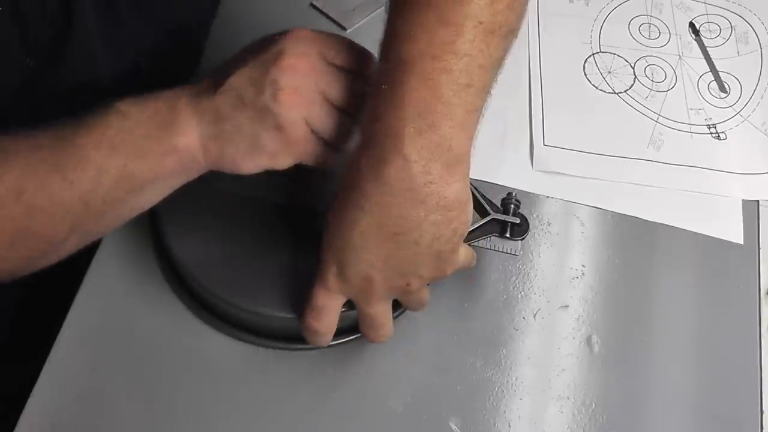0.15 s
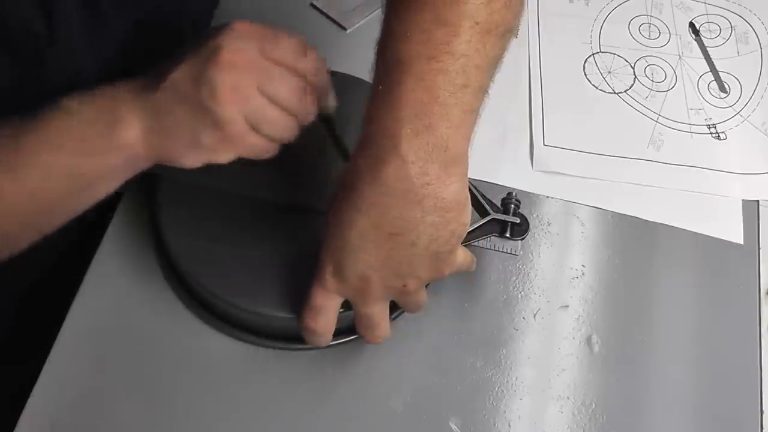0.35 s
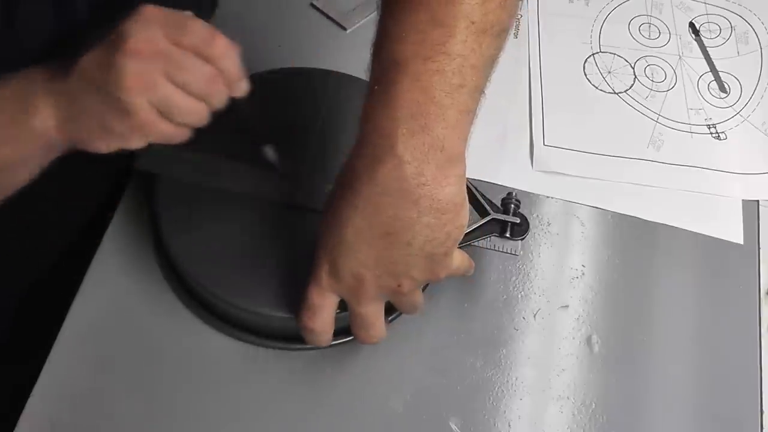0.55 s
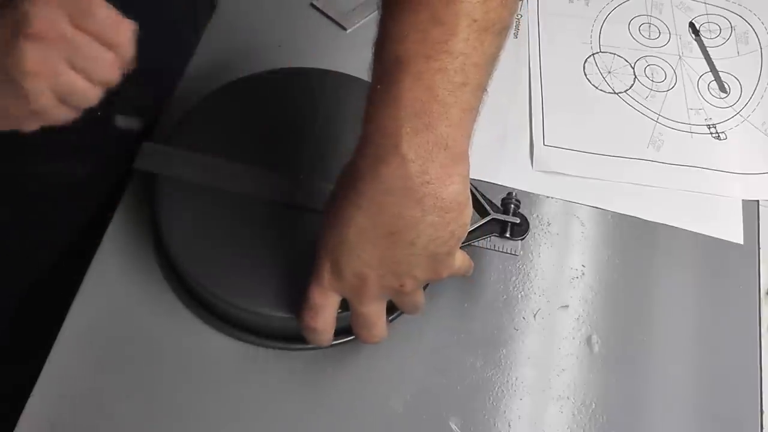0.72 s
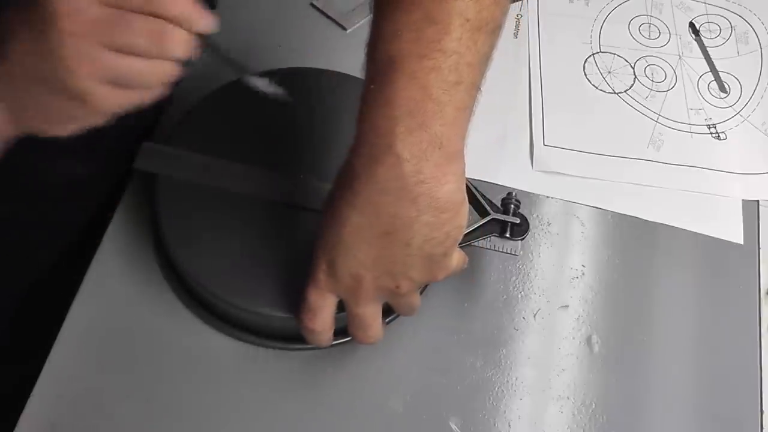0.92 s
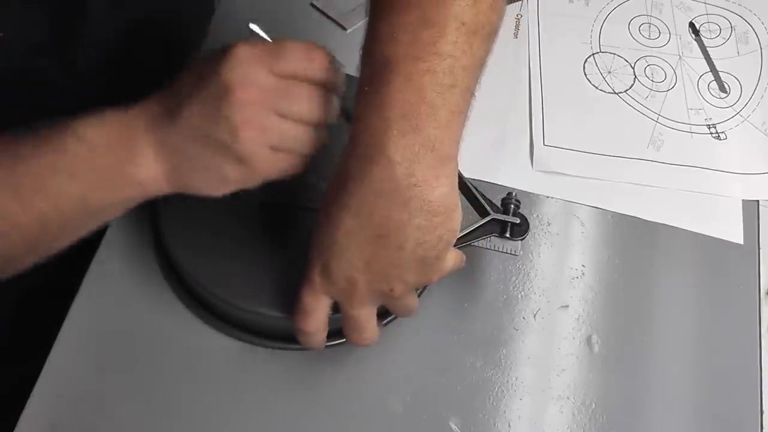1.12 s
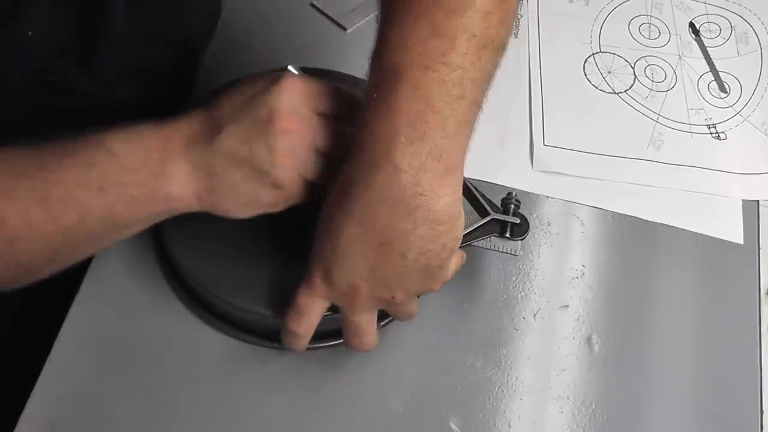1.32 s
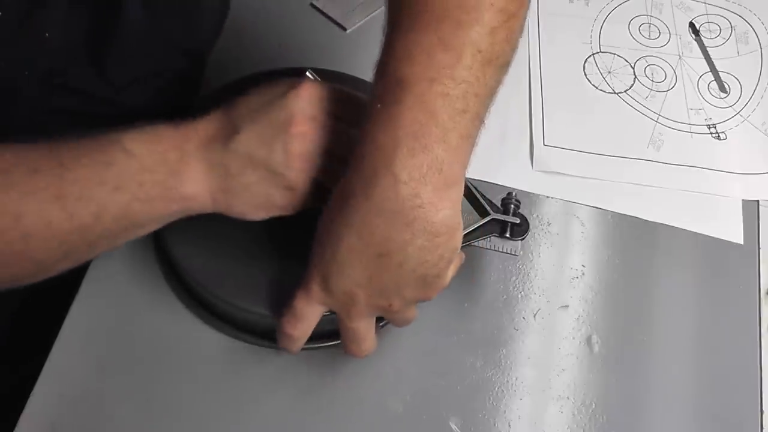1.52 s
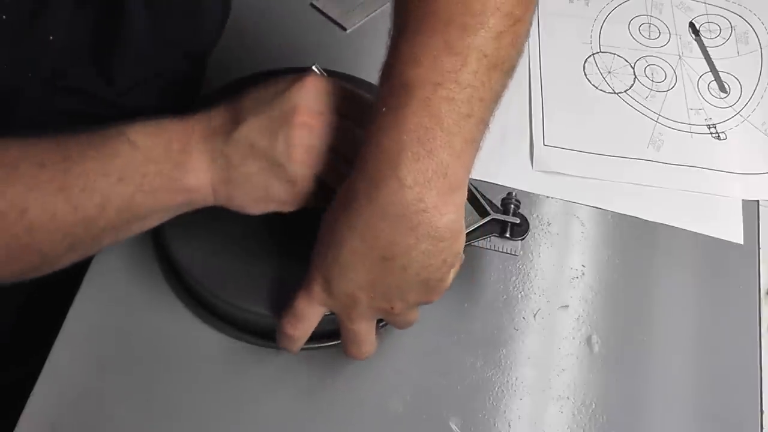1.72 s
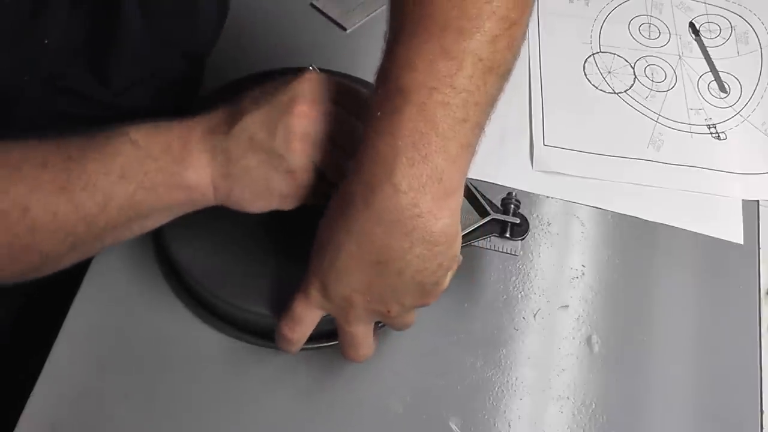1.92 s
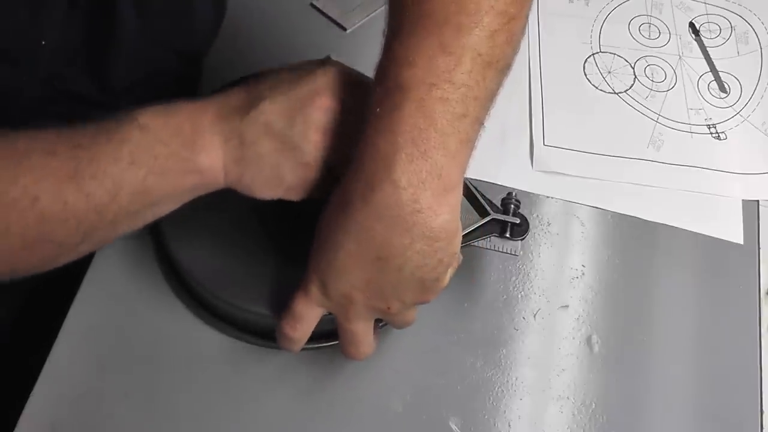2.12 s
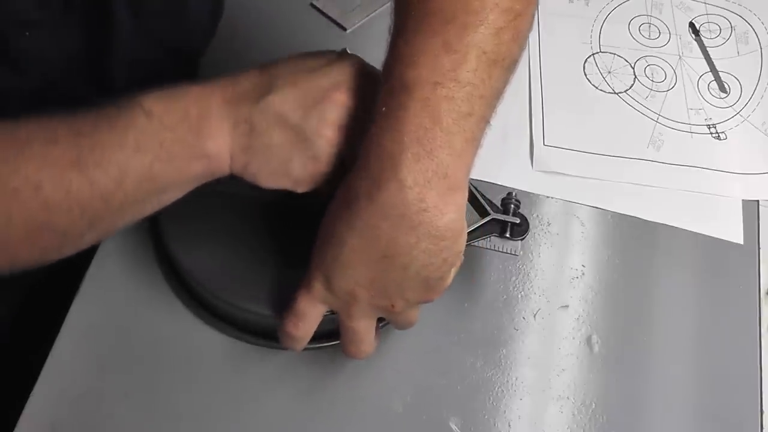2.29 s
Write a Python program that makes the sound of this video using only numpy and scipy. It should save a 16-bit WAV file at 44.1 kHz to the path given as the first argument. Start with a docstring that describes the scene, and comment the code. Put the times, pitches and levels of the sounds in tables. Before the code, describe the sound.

Metal point drawn in one long hissing scratch over a hand-held pan, ending in squeal and knocks

```python
"""Steel scriber across a metal pan.

One long stroke crosses an upturned pan held on a workbench; countless tiny slips ring the pan and
make the scriber hiss. It squeals briefly and knocks off the rim, then is set down and nudged into place.
Random friction impulses and knocks drive filters for pan and shaft; noise echoes form a live workshop."""
import sys
import numpy as np
from scipy import signal
from scipy.fft import rfft, irfft
from scipy.io import wavfile

SR = 44100
rng = np.random.default_rng(int(sys.argv[2]) if len(sys.argv) > 2 else 0)


def to_wav(s):
    """Save 16-bit WAV."""
    ch = np.atleast_2d(s).T  # columns
    pcm = np.round(np.clip(ch, -1, 1) * 32767)  # PCM
    wavfile.write(sys.argv[1], SR, pcm.astype(np.int16))


N = 103635
TIME_S = np.arange(N) / SR


def from_db(db):
    """Decibels to amplitude gain."""
    return 10 ** (np.asarray(db) / 20)


def rms_one(x):
    """Scale to unit power."""
    return x / np.sqrt(np.mean(x ** 2) + 1e-20)


def unit_energy(x):
    """Scale a response so that it keeps the power of white noise."""
    return x / np.sqrt(np.sum(x ** 2) + 1e-20)


def gain_curves(rows):
    """Gains interpolated in dB from (time_s, level_db, ..) rows; -120 dB outside them."""
    time_s, *levels_db = np.transpose(rows)
    return [from_db(np.interp(TIME_S, time_s, db, left=-120, right=-120)) for db in levels_db]


def at_hz(points, hz):
    """Read a table on a log-frequency axis."""
    table_hz, values = np.transpose(points)
    return np.interp(np.log(np.maximum(hz, 1)), np.log(table_hz), values)


def through(x, response):
    """Convolve a signal with an impulse response."""
    return signal.fftconvolve(x, response)[:N]


def colour(points, peaks=()):
    """Minimum-phase response of a body: resonances on a broad spectrum."""
    size = 32768
    hz = np.fft.rfftfreq(size, 1 / SR)
    power = 1
    for centre_hz, width_hz, boost_db in peaks:
        power = power + from_db(boost_db) ** 2 / (1 + (2 * (hz - centre_hz) / width_hz) ** 2)
    magnitude = from_db(at_hz(points, hz)) * np.sqrt(power)
    # folding the cepstrum makes the response causal
    cepstrum = irfft(np.log(magnitude))
    cepstrum[1:size // 2] *= 2
    cepstrum[size // 2 + 1:] = 0
    return unit_energy(irfft(np.exp(rfft(cepstrum))))


def band_filter(x, hz, kind, order=2):
    """Butterworth filter."""
    return signal.sosfilt(signal.butter(order, hz, kind, fs=SR, output="sos"), x)


def dull(x, hz):
    """Soft contact: a low-pass."""
    return band_filter(x, hz, "low")


def drift(cutoff_hz):
    """Slow low-passed noise with unit spread, past the filter's start-up."""
    return rms_one(dull(rng.standard_normal(2 * N), cutoff_hz)[N:])


def swell(peak_s, spread_s):
    """Gaussian rise and fall."""
    return np.exp(-.5 * ((TIME_S - peak_s) / spread_s) ** 2)


def dying(t60_s):
    """Exponential decay, floored at -240 dB."""
    return from_db(-60 * np.minimum(TIME_S / t60_s, 4))


def scatter(decay_s):
    """Burst of dense echoes: whitening alternates with a taper that keeps it short."""
    size = 8192
    burst = rng.standard_normal(size) * dying(decay_s)[:size]
    taper = np.exp(-(TIME_S[:size] / decay_s) ** 4)
    for _ in range(6):
        spectrum = rfft(burst)
        burst = irfft(spectrum / (np.abs(spectrum) + 1e-12)) * taper
    return unit_energy(burst)


# steady air noise spectrum: [hz, relative_db]
AIR_SPECTRUM = [(20, -13.5), (40, -29), (62, -3), (95, -2.5), (122, 2.5), (160, -8.5), (600, -10),
                (1000, -21.5), (2200, -27), (4500, -30.5), (6200, -30.5), (10000, -30.5), (15500, -37.5)]
AIR_DB, AIR_SIDE_DB = -56.5, -4  # side is relative to mid


def air():
    """Steady stereo background: coloured noise in mid and side."""
    mid, side = (through(rng.standard_normal(N), colour(AIR_SPECTRUM)) for _ in range(2))
    return from_db(AIR_DB) * (mid + from_db(AIR_SIDE_DB) * side * [[1], [-1]])


# workshop decay: [hz, t60_s]
ROOM_DECAY = [(100, 3.5), (600, 0.99), (1500, 1.2), (6000, 0.19), (9000, 1), (15000, -0.1)]
# workshop reverberation spectrum: [hz, level_db]
ROOM_SPECTRUM = [(100, -0.5), (230, -15), (450, -17.5), (720, -1), (1000, -10), (1500, -9.5), (4000, -7.5),
                 (7000, -7), (9000, -16), (15000, -11.5)]


def workshop(x):
    """One ear's reverberation: each band of the echo dies at its own rate."""
    edges_hz = np.geomspace(62, 16000, 24)
    white = rng.standard_normal((2, N))  # alternates between neighbouring bands
    tail = 0
    for k, (low_hz, high_hz) in enumerate(zip(edges_hz, edges_hz[1:])):
        hz = np.sqrt(low_hz * high_hz)
        band = band_filter(white[k % 2], [low_hz, high_hz], "band")
        echo = unit_energy(band * dying(at_hz(ROOM_DECAY, hz)))
        bandwidth_gain = np.sqrt(2 * (high_hz - low_hz) / SR)
        tail = tail + from_db(at_hz(ROOM_SPECTRUM, hz)) * bandwidth_gain * echo
    return through(x, tail)


EARLY_DB, EARLY_DECAY_S = -12.5, 0.02


def bench_reflections(x):
    """Short dense echoes, opposite in the two ears."""
    return from_db(EARLY_DB) * through(x, scatter(EARLY_DECAY_S)) * [[1], [-1]]


SLIPS_PER_S, SLIP_SPREAD_DB = 7000, 0.5
CHATTER_HZ, CHATTER_DB = 74, 1


def slips():
    """Friction force: tiny catches of uneven size that come in clumps."""
    spread_db = SLIP_SPREAD_DB * np.minimum(rng.exponential(1, N), 4)
    sizes = from_db(spread_db) * rng.choice([-1, 1], N)
    clumps = from_db(CHATTER_DB * rms_one(dull(rng.standard_normal(N), CHATTER_HZ)))
    catches = rng.random(N) < SLIPS_PER_S / SR
    return rms_one(sizes * clumps * catches)


# hand rub on the pan, and the high hiss dying away after the stroke: [time_s, hand_rub_db, high_hiss_db]
RUB_AND_TAIL_LEVELS = [(0, -43.5, -66.5), (.07, -67, -70), (.14, -53, -74), (.83, -51, -45),
                       (1.02, -42, -53.5), (1.12, -55, -70), (1.32, -57, -64.5), (1.42, -60, -73),
                       (1.55, -61, -73), (2.1, -52, -73), (2.35, -65, -76)]
HAND_DULL_HZ = 480


def hand_rub_and_hiss_tail(friction):
    """A dulled hand rub on the pan, and faint friction for the high hiss dying away after the stroke."""
    rub, high_hiss = gain_curves(RUB_AND_TAIL_LEVELS)
    return dull(rub * slips(), HAND_DULL_HZ), high_hiss * friction


# friction squeaks: [centre_s, spread_s, pitch_hz, width_hz, level_db]
SQUEAK_EVENTS = [(0.035, 0.08, 379, 40, -49.5), (1.33, 0.036, 2530, 89, -70),
                 (1.81, 0.036, 5410, 170, -66.5)]


def squeaks():
    """Faint squeaks and rasps: short swells of friction in one narrow resonance."""
    total = np.zeros(N)
    for centre_s, spread_s, pitch_hz, width_hz, level_db in SQUEAK_EVENTS:
        b, a = signal.iirpeak(pitch_hz, pitch_hz / width_hz, fs=SR)
        tone = rms_one(signal.lfilter(b, a, slips()))
        total += from_db(level_db) * swell(centre_s, spread_s) * tone
    return total


# light rubbing while the point is placed: [time_s, pan_rumble_db, scriber_hiss_db]
NUDGE_LEVELS = [(1.62, -28, -60), (1.655, -43, -80), (1.69, -40, -81), (1.73, -49, -72),
                (1.755, -32.5, -57), (1.795, -33.5, -60), (1.825, -45.5, -68), (1.854, -40, -60),
                (1.89, -49.5, -89), (1.955, -51, -73), (1.975, -75, -118)]
RUB_DULL_HZ = 850


def nudge(friction):
    """Light friction: a dulled rumble force on the pan and a hiss force on the shaft."""
    rumble, hiss = gain_curves(NUDGE_LEVELS)
    return dull(rumble * friction, RUB_DULL_HZ), hiss * friction


# knocks of the point on the pan: [start_s, knock_db, centre_hz, q, tick_db]
TAP_EVENTS = [(.803, 5, 816, 2.7, -18), (.817, 11.5, 700, 2.2, -11.5), (.840, 5, 735, 2.4, -27),
              (.866, 2, 637, 2.4, -42), (1.616, -7.5, 1780, 2.5, -27), (1.618, 0, 292, 0.39, -30),
              (1.743, -13, 840, 0.94, -30), (1.775, 1, 510, 1.32, -19), (1.782, 1.5, 713, 1.36, -26),
              (1.953, -16, 494, 1.06, -44), (2.066, -16.5, 550, 0.94, -30), (2.070, -21, 1600, 1.2, -31.5)]


def taps():
    """Knock forces: a soft push on the pan in one band, a sharp tick on the shaft."""
    push, tick = np.zeros(N), np.zeros(N)
    for start_s, knock_db, centre_hz, q, tick_db in TAP_EVENTS:
        click = signal.unit_impulse(N, int(start_s * SR))
        b, a = signal.iirpeak(centre_hz, max(q, .5), fs=SR)
        once = signal.lfilter(b, a, click + 1e-18)  # tiny offsets avoid denormals
        push += from_db(knock_db) * signal.lfilter(b, a, once + 1e-18)
        tick += from_db(tick_db) * click
    return push, tick


# squealing shaft modes: [pitch_hz, width_hz, boost_db]
SQUEAL_MODES = [(5980, 250, 16.5), (8480, 80, 12), (8230, 78, 10.5), (8680, 69, 13.5)]
# broad band under the squeal: [hz, relative_db]
SQUEAL_SPECTRUM = [(300, -70), (3000, -37), (5700, -9), (9000, 1.5), (15000, -23)]
SQUEAL_PEAK_S, SQUEAL_RISE_S, SQUEAL_FALL_S = 0.7765, 0.06, 0.0085  # Gaussian spreads
SQUEAL_DB, SQUEAL_ROOM_DB = -23, -6.5  # room send is relative to the direct squeal


def squeal():
    """High shaft modes swell as the point speeds up, then break off."""
    spread_s = np.where(TIME_S < SQUEAL_PEAK_S, SQUEAL_RISE_S, SQUEAL_FALL_S)
    modes = through(slips(), colour(SQUEAL_SPECTRUM, SQUEAL_MODES))
    return from_db(SQUEAL_DB) * swell(SQUEAL_PEAK_S, spread_s) * modes


# shaft resonances under pressure: [pitch_hz, width_hz, boost_db]
PRESSED_MODES = [(2680, 600, 4.5), (3115, 71, 9.5), (5550, 300, 8), (6180, 150, 12), (6560, 320, -4.5),
                 (8910, 880, 9.5), (12200, 250, 10.5)]
# hiss under pressure: [hz, relative_db]
PRESSED_HISS = [(150, -73), (1200, -16), (2200, -8), (2700, 4.5), (4000, 3.5), (4700, 0.5), (5700, 6.5),
                (7400, 6), (9200, 0.5), (10200, -0.5), (10800, -6.5), (13500, -11.5), (15700, -19)]
# shaft resonances when lightly held: [pitch_hz, width_hz, boost_db]
FREE_MODES = [(5350, 110, 11.5), (5880, 100, 10.5), (6370, 120, 14), (8730, 57, 15)]
# hiss of a light touch: [hz, relative_db]
TOUCH_HISS = [(150, -46), (1200, 5), (2500, -1.5), (3800, -0.5), (4700, -4.5), (5400, 3.5), (7400, 3),
              (9500, -6), (12000, -13), (15700, -16)]
SHAFT_DECAY_S = 0.018


def scriber(hard, light):
    """A light touch lets the shaft ring; hard pressure damps it and favours broad hiss."""
    pressed = through(hard, colour(PRESSED_HISS, PRESSED_MODES))
    free = through(light, colour(TOUCH_HISS, FREE_MODES))
    return through(pressed + free, scatter(SHAFT_DECAY_S))


# clear pan modes: [pitch_hz, width_hz, boost_db]
PAN_MODES = [(200.6, 9.4, 14.5), (224.7, 12.6, 17), (299.2, 15.8, 8.5), (339.4, 9, 12.5), (439, 6.8, 12.5),
             (479.8, 17, 11.5), (527, 20, 6.5), (656.3, 35, 9), (746, 7.7, 2.5), (859.4, 25, 3),
             (1173, 45, 8), (1247, 17.6, 11.5), (1340, 45, 4.5), (1512, 30, 13)]
# dense pan ringing: [hz, relative_db]
PAN_SPECTRUM = [(30, -51), (100, -12.5), (170, -4.5), (270, -2.5), (720, 2), (1000, -8), (1130, -4.5),
                (1600, -10.5), (1880, -6.5), (2050, -18), (4000, -32), (10000, -112)]
PAN_DECAY_S = 0.0246


def pan(force):
    """Clear modes over a dense ring that the hand damps quickly."""
    modes = np.pad(colour(PAN_SPECTRUM, PAN_MODES), (0, N))
    return through(force, through(modes, scatter(PAN_DECAY_S)))


STREAK_DB, STREAK_HZ = 2.2, 16


def streaks(x):
    """As the point travels, each band of its scrape swells and fades on its own."""
    edges_hz = np.geomspace(180, 16000, 44)
    spectrum = rfft(x)
    band = np.digitize(np.fft.rfftfreq(N, 1 / SR), edges_hz)
    total = np.zeros(N)
    for k in range(len(edges_hz)):  # everything above the last edge is left out
        total += irfft(spectrum * (band == k), N) * from_db(STREAK_DB * drift(STREAK_HZ))
    return rms_one(total)


# long stroke: [time_s, pan_ringing_db, pan_bass_db, scriber_hiss_db]
STROKE_LEVELS = [(.13, -80, -51, -72), (.16, -46, -30, -57.5), (.196, -38, -35, -44),
                 (.25, -39, -30.5, -47.5), (.275, -38.5, -29.5, -50), (.338, -34, -34, -41.5),
                 (.39, -37, -28, -38), (.455, -30, -27.5, -34.5), (.53, -31.5, -27.5, -37),
                 (.59, -22, -18.5, -35.5), (.655, -23, -19, -34.5), (.71, -22.5, -31, -29.5),
                 (.762, -30.5, -48, -35.5), (.794, -30.5, -48, -32.5), (.819, -27, -48, -27),
                 (.829, -62, -65, -41)]
BASS_SPLIT_HZ = 294


def stroke(friction):
    """Streaky friction drives shaft and upper pan; separate slips drive the pan's bass."""
    ring, bass, hiss = gain_curves(STROKE_LEVELS)
    scrape = streaks(friction)
    upper = ring * band_filter(scrape, BASS_SPLIT_HZ, "high")
    lower = bass * dull(slips(), BASS_SPLIT_HZ)
    return upper + lower, hiss * scrape


def scene():
    """Friction and knocks drive pan and scriber; bench reflections and the room spread them."""
    friction = slips()
    hand_rub, hiss_tail = hand_rub_and_hiss_tail(friction)
    nudge_rumble, nudge_hiss = nudge(friction)
    push, tick = taps()
    stroke_force, stroke_hiss = stroke(friction)

    pan_sound = pan(stroke_force + nudge_rumble + hand_rub + push)
    high_sound = scriber(stroke_hiss, nudge_hiss + hiss_tail + tick)
    body = pan_sound + high_sound + squeaks()
    whistle = squeal()

    direct = body + whistle
    to_room = body + from_db(SQUEAL_ROOM_DB) * whistle
    room = np.array([workshop(to_room), workshop(to_room)])
    return direct + bench_reflections(direct) + room + air()


CUTOFF_HZ = 15600


def record(dry):
    """The top is cut steeply by an elliptic low-pass."""
    return signal.sosfilt(signal.ellip(12, .1, 90, CUTOFF_HZ, fs=SR, output="sos"), dry)


dry = scene()
out = record(dry)
to_wav(out)
```